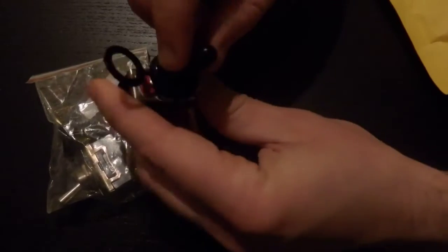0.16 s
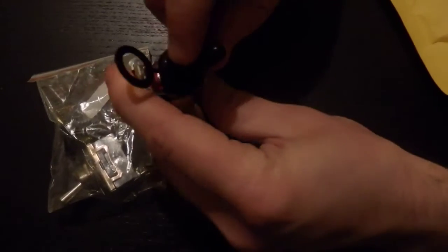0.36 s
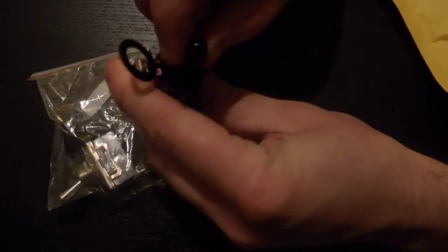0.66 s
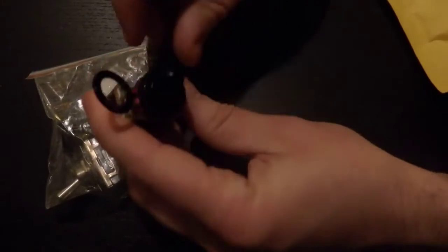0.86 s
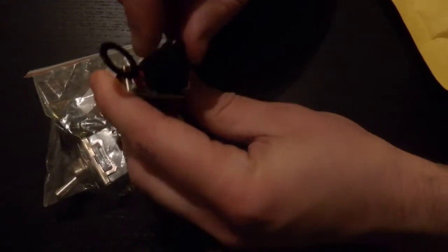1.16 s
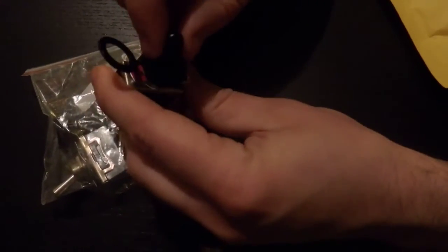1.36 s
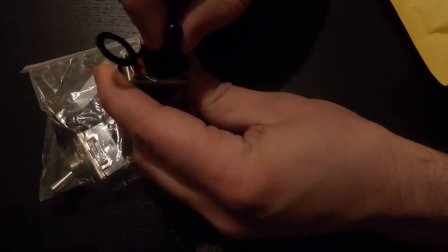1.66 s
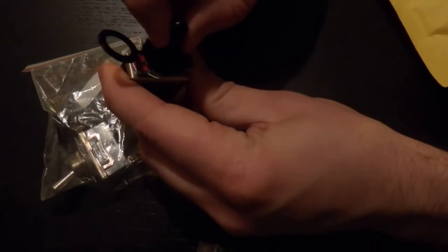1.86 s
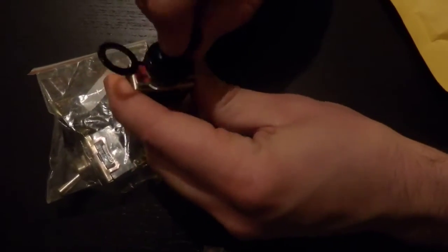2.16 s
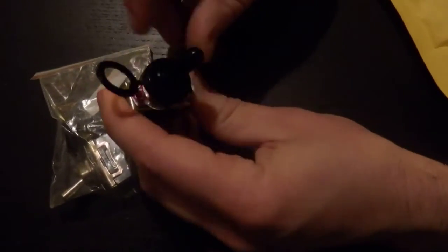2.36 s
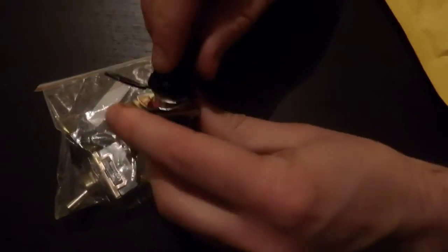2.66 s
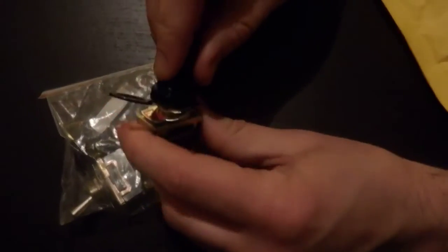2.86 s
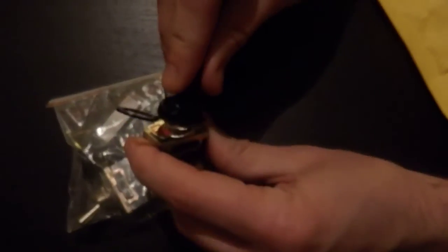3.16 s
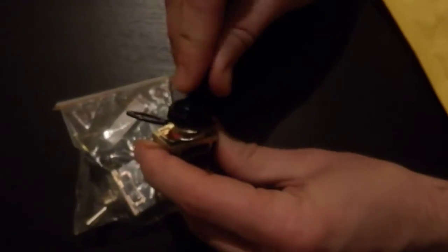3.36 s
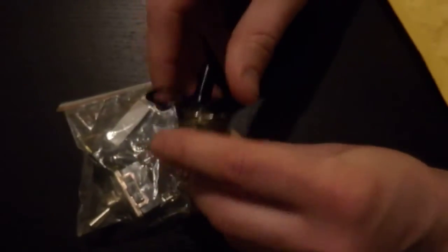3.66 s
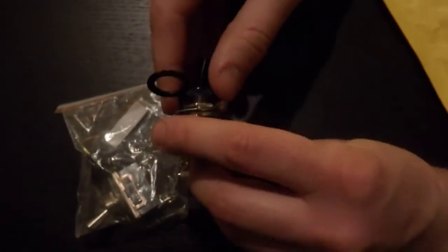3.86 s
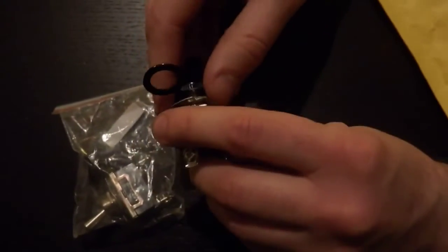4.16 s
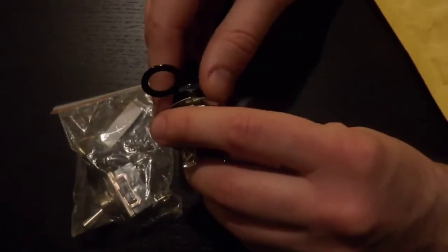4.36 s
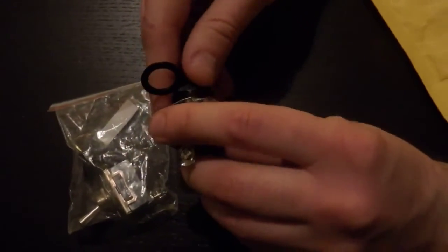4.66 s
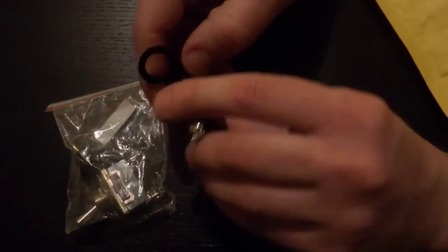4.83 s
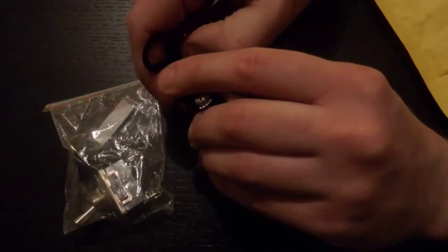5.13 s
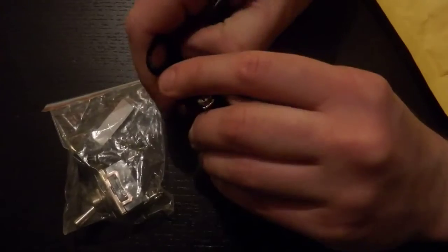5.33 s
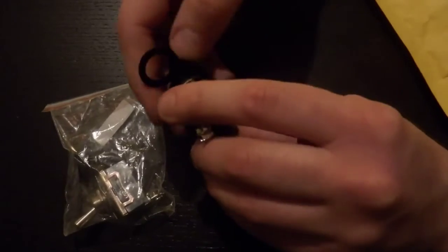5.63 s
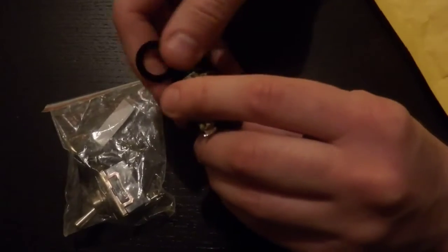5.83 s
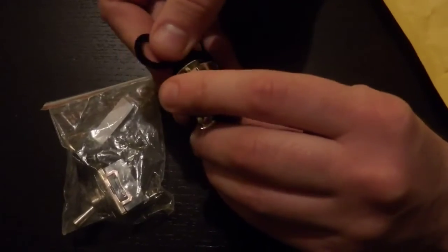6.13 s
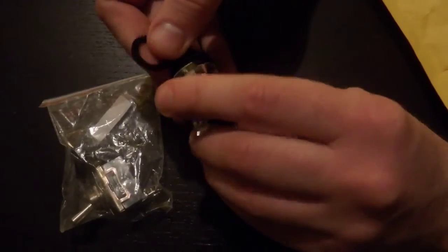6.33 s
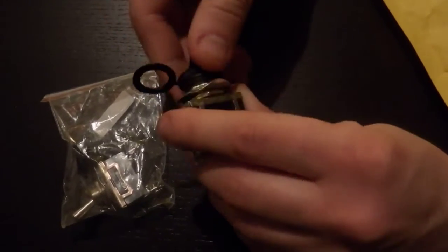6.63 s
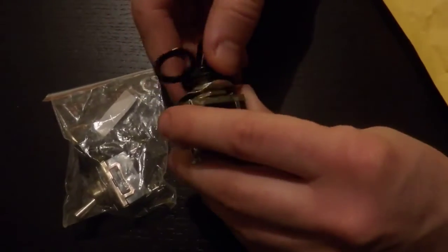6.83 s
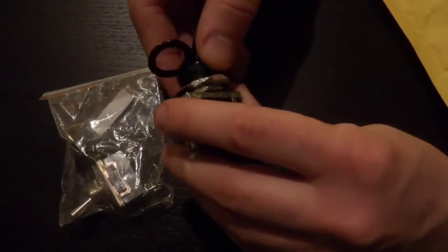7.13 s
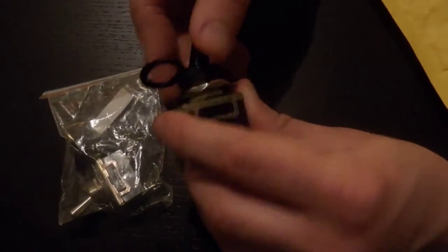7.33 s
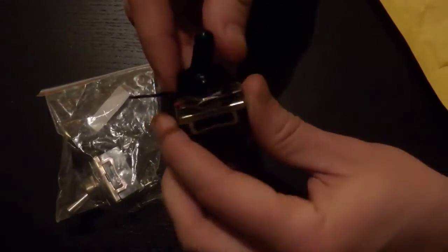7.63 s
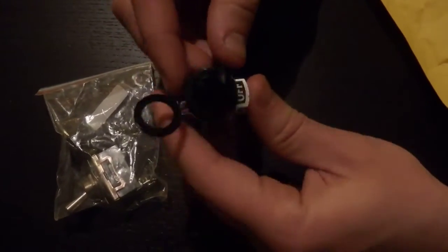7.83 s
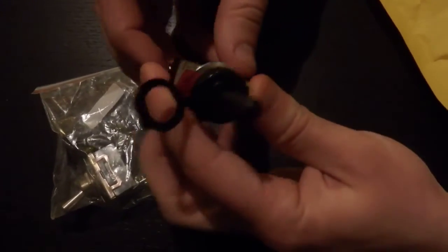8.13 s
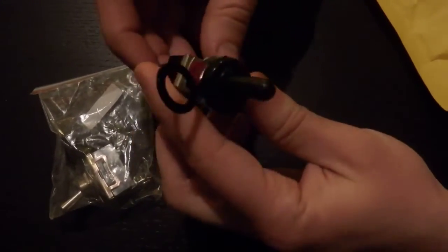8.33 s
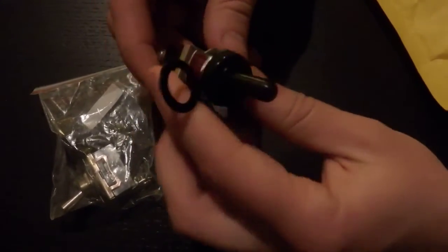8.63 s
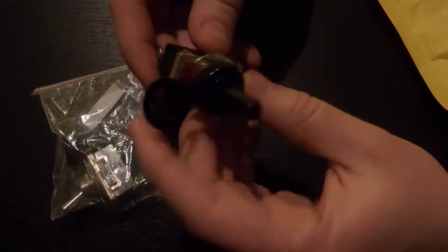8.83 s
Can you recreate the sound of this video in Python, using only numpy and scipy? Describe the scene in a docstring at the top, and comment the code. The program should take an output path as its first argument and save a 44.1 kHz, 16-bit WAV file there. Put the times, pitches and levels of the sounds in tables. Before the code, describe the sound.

In a quiet room, a metal toggle switch snaps sharply close to the microphone, then snaps again with a brief high ring from its spring. Fingers go on handling it, making light, scattered metal clicks and soft rubs as a rubber cover sticks and slips. A faint, rapid focus motor ticking runs through the middle. A few brighter clicks come near the end, over low rumble and slight hiss.

```python
"""First comes the low rumble of a quiet room, under faint hiss, at the microphones of a camera on a table.
Close by, hands work a rubber boot over a metal toggle switch. The lever snaps over twice, striking
the housing and rebounding; the second snap sets its spring ringing. Fingers click on the metal, and
rubber sticks and slips. Through the middle, the camera's focus motor ticks fifteen times a second."""
import sys
import numpy as np
from scipy import signal
from scipy.fft import rfft, irfft
from scipy.io import wavfile
from scipy.ndimage import uniform_filter1d

SR = 44100
rng = np.random.default_rng(int(sys.argv[2]) if len(sys.argv) > 2 else 0)


def unload_wav(signal):
    """Save mono or channel-first audio to the path in sys.argv[1] as 16-bit WAV at rate SR, clipped to [-1, 1]."""
    wavfile.write(
        sys.argv[1],
        SR,
        np.round(np.clip(np.atleast_2d(signal).T, -1, 1) * 32767).astype(np.int16),
    )


N = 396459


def amp(db):
    """Decibels to gain."""
    return 10 ** (np.asarray(db) / 20)


def unit_rms(x):
    """Scales to an rms of one."""
    return x / np.sqrt(np.mean(x ** 2) + 1e-20)


def curve_at(points, hz):
    """Reads a curve on a log-frequency axis."""
    f, value = np.transpose(points)
    return np.interp(np.log(hz + 1), np.log(f + 1), value)


def panned(pan_db):
    """Gains at the two microphones; pan is left minus right in dB."""
    return amp(np.array([[pan_db], [-pan_db]]) / 2)


def add(mix, start, sound):
    """Mixes in a stereo sound at a start in seconds."""
    part = mix[:, max(round(start * SR), 0):][:, :sound.shape[1]]
    part += sound[:, :part.shape[1]]


def coloured(x, points, size=4096):
    """Minimum-phase filter that follows a curve of Hz and dB."""
    log_gain = np.log(amp(curve_at(points, abs(np.fft.fftfreq(size, 1 / SR)))))
    taps = np.fft.ifft(np.exp(np.conj(signal.hilbert(log_gain)))).real
    return signal.fftconvolve(x, taps[None, :size // 2], axes=1)


def toned(x, body_db, edge_db):
    """Soft contacts bring out the body around 3 kHz, hard ones the edge around 15 kHz."""
    tone = [(500, 0), (1800, body_db), (3600, body_db), (7300, 0.0029), (10500, 0), (13800, edge_db)]
    return coloured(x, tone)


def ring(modes, rise_s, loose_cycles=0.074, size=2048):
    """One blow on damped modes, each reaching the two microphones with a slightly loose phase."""
    t = np.arange(size) / SR
    lag_s = np.array([[0], [.000016]])  # the right microphone hears it a little later
    out = 0
    for hz, width, db, pan_db in modes:
        phase = loose_cycles * rng.standard_normal((2, 1)) - hz * lag_s
        decay = np.exp(-np.pi * width * t)
        out = out + amp(db) * panned(pan_db) * decay * np.sin(2 * np.pi * (hz * t + phase))
    out = out * (1 - np.exp(-(t / rise_s) ** 2))
    return out / np.sqrt(np.mean(out[:, :SR // 200] ** 2))  # rms of one over the first 5 ms


def varied(modes, detune, spread_db):
    """The modes as one blow finds them, each a little off in pitch and strength."""
    chance = rng.standard_normal((len(modes), 2))
    return [(hz * (1 + detune * a), width, db + spread_db * b, pan_db)
            for (hz, width, db, pan_db), (a, b) in zip(modes, chance)]


# How alike the two microphones hear the background. Each row: frequency in Hz, likeness from 0 to 1.
MIC_LIKENESS = [(60, 0.91), (120, 0.99), (240, 0.97), (480, 0.91), (950, 0.84), (1890, 0.2), (3770, 0),
                (7520, 0.05), (15000, 0.02)]
BIN_HZ, TIME_S = np.fft.rfftfreq(N, 1 / SR), np.arange(N) / SR


def noise_pair(gain_db):
    """Steady noise of a given spectral shape, nearly mono in the bass."""
    left, other = rfft(rng.standard_normal((2, N)))
    likeness = np.clip(curve_at(MIC_LIKENESS, BIN_HZ), -1, 1)
    right = likeness * left + np.sqrt(1 - likeness ** 2) * other
    return unit_rms(irfft(np.array([left, right]) * amp(gain_db), N))


# Room tone at the table. Each row: frequency in Hz, relative level in dB.
RUMBLE_COLOUR = [(12, -48.5), (20, -16.5), (43, -16.5), (75, -7), (141, -5.5), (166, -2), (217, -3.5),
                 (238, -8), (270, -1), (295, -3.5), (416, -5), (597, -13), (783, -9.5), (1300, -26.5),
                 (1500, -31.5), (1950, -33.5), (3300, -120)]
# The room's standing waves. Each row: frequency in Hz, width in Hz, lift above the rumble in dB.
STANDING_WAVES = [(75, 12, 4), (178, 28, 5), (219.6, 7, 9.5), (260.4, 11, 6), (325.4, 11, 7),
                  (414.8, 10, 5.5), (552.3, 29, 6), (648, 23, 5), (799, 8.7, 5)]
# The rumble's slow swell. Each row: time in seconds, level in dB.
RUMBLE_SWELL = [(0, -52.5), (.55, -53), (.9, -55.5), (2.0, -53), (3.5, -54.5), (4.3, -51.5), (4.6, -54.5),
                (5.6, -54.5), (6.1, -52), (6.6, -54), (8.99, -54)]


def room_rumble():
    """Low noise excites the room's standing waves, a little right of centre."""
    standing_db = sum(db / (1 + (2 * (BIN_HZ - hz) / width) ** 2) for hz, width, db in STANDING_WAVES)
    swell = amp(np.interp(TIME_S, *np.transpose(RUMBLE_SWELL)))
    return noise_pair(curve_at(RUMBLE_COLOUR, BIN_HZ) + standing_db) * swell * panned(-1.7)


# Low tones in the room. Each row: peak time and spread in seconds, pitch in Hz, peak level in dB.
DRONE_TONES = [(0.169, 0.13, 72.9, -58.5), (.7, 0.43, 73.2, -66), (.58, 0.25, 685, -65),
               (1.8, 0.11, 370.7, -59), (4.05, 0.7, 262, -59), (4.25, 0.16, 684, -63.5),
               (5.92, 0.12, 221, -55), (6.1, 0.22, 412.3, -61.5), (8.0, 0.2, 222.3, -53)]


def drones():
    """Faint tones swell out of the rumble and fade, wavering in pitch."""
    out = np.zeros(N)
    for peak, spread, hz, db in DRONE_TONES:
        waver = np.interp(TIME_S, np.linspace(0, TIME_S[-1], 120), rng.standard_normal(120))
        cycles = np.cumsum(hz * (1 + 0.013 * waver)) / SR
        swell = np.exp(-((TIME_S - peak) / spread) ** 2)
        out += amp(db) * np.sqrt(2) * swell * np.sin(2 * np.pi * cycles)
    return out * panned(-2.0)


# The microphones' noise floor. Each row: frequency in Hz, relative level in dB.
HISS_COLOUR = [(700, -10), (1400, 7), (2200, 7), (2800, 5), (3400, 0), (7000, 0), (9300, -1), (11500, -3),
               (13000, 0), (15000, 6), (15700, 11), (15900, -8), (16100, -30)]


def microphone_hiss():
    """The microphones add a steady hiss of their own."""
    return amp(-74.0) * noise_pair(curve_at(HISS_COLOUR, BIN_HZ))


# The camera's steady whine. Each row: centre and half-width in Hz, level and pan in dB.
WHINE_BANDS = [(8350, 230, -90.5, -8.5), (11220, 90, -100.5, -11.5)]
# Its spells of whirring. Each row: start and end in seconds.
WHIR_SPELLS = [(4.2, 4.6), (6.22, 6.7), (7.36, 7.7), (8.25, 9)]


def camera_whine():
    """Narrow bands of high noise from the camera: two hold steady, a third comes and goes."""
    def band(hz, half_width_hz, db, pan_db):
        shape_db = -20 * np.log10(1 + ((BIN_HZ - hz) / half_width_hz) ** 2)
        return amp(db) * panned(pan_db) * noise_pair(shape_db)

    whine = sum(band(*row) for row in WHINE_BANDS)
    running = sum(1.0 * (TIME_S > start) * (TIME_S < end) for start, end in WHIR_SPELLS)
    whir = band(hz=8250, half_width_hz=400, db=-89, pan_db=-2.0)
    return whine + uniform_filter1d(running, size=2048) * whir


# The room's decay. Each row: frequency in Hz, seconds to fall by 60 dB.
ROOM_DECAY = [(497.5, 0.16), (2810, 0.4), (4200, 0.34), (6000, .44), (8950, 0.46), (10400, 0.37),
              (13100, 0.26), (15500, 0.21)]


def room_tail(x):
    """The room returns a short diffuse tail that lingers longest in the mid treble."""
    hz, t, spectra = signal.stft(rng.standard_normal((2, SR * 2 // 3)), SR, nperseg=256)
    decay_db = -60 * t / curve_at(ROOM_DECAY, hz)[:, None]
    tail = signal.istft(spectra * amp(decay_db), SR, nperseg=256)[1]
    tail *= 1 - np.exp(-(np.arange(tail.shape[1]) / SR / 0.0043) ** 2)
    return signal.fftconvolve(x, tail / np.linalg.norm(tail[0]), axes=1)[:, :N]


# A wall near the table. Each row: frequency in Hz, gain of its reflection in dB.
WALL_COLOUR = [(1000, -14), (2800, -7.5), (3400, -11), (4400, -2), (5500, -20), (8500, -14), (13000, -24)]


def wall_echo(x, delay_s=.0133):
    """One dull early reflection reaches the microphones just behind the direct sound."""
    out = np.zeros((2, N))
    add(out, delay_s, coloured(x, WALL_COLOUR))
    return out


# Inside the camera: the drive's tick, the lens barrel's slower ring and the click of a catching step.
# Each row: frequency and width in Hz, relative level and pan in dB.
DRIVE_MODES = [(4700, 1000, 6, -5.5), (6100, 720, 3, 0), (7140, 530, 2, 0), (8580, 700, 8, -8),
               (9280, 600, -3, -12)]
BARREL_MODES = [(1037, 71, -0.5, 0), (1147, 53, 1.5, 0), (1350, 130, -1.5, 0), (1660, 170, 1.5, 0),
                (1856, 89, 2, 0), (2190, 165, -1.5, 0), (2770, 240, -6, 0)]
CATCH_MODES = [(2010, 230, -5.5, -7), (4640, 760, 1, -1), (5520, 660, 5.5, 1), (6900, 410, -2, 0)]
# Step force as the lens travels. Each row: time in seconds, base levels of barrel and drive in dB.
STEP_FORCE = [(1.28, -64, -64.5), (2.1, -65.5, -65.5), (2.58, -64, -62.5), (2.73, -68, -74.5),
              (2.83, -62, -57.5), (2.95, -71, -67.5), (3.02, -71, -78.5), (3.12, -67.5, -65.5),
              (3.6, -67.5, -66), (4.3, -65, -70), (4.75, -64, -65), (4.829, -65.5, -64.5),
              (5.299, -66, -66), (5.43, -68, -71), (5.75, -65, -67), (5.83, -69.5, -62), (6.08, -64, -63),
              (6.16, -61.5, -70)]
# Steps that catch. Each row: start in seconds, level in dB.
STEP_CATCHES = [(1.483, -75), (2.35, -68), (2.817, -64), (3.618, -63), (3.885, -68), (4.152, -66),
                (4.419, -63.5), (4.486, -79), (4.819, -75), (5.286, -70), (5.42, -63.5), (5.687, -63.5),
                (6.157, -65.5)]
FOCUS_START_S, FOCUS_END_S, STEPS_PER_S = 1.2825, 6.17, 14.985


def focus_motor():
    """Steps, strong and weak in turn: the drive takes up its slack, ticks and shakes the lens barrel."""
    out = np.zeros((2, N))
    times, barrel_db, drive_db = np.transpose(STEP_FORCE)
    for k, start in enumerate(np.arange(FOCUS_START_S, FOCUS_END_S, 1 / STEPS_PER_S)):
        swing_db = 1.2 * (-1) ** (k + 1) + 1.3 * rng.standard_normal()
        for part, force_db in ((DRIVE_MODES, drive_db - 3.0), (BARREL_MODES, barrel_db + 2.0)):
            level_db = np.interp(start, times, force_db) + swing_db
            slack_s = .0022 * rng.uniform(.6, 1.5)
            for ahead, db in ((slack_s, -8), (0, 0)):
                modes = varied(part, detune=.013, spread_db=1.7)
                add(out, start - ahead, amp(level_db + db) * ring(modes, rise_s=.001, loose_cycles=.16))
        # the barrel rattles once after each step
        rattle_db = np.interp(start, times, barrel_db) + swing_db - 5
        rattle_start = start + .0026 * rng.uniform(.5, 1.5)
        modes = varied(BARREL_MODES, detune=.06, spread_db=1.7)
        add(out, rattle_start, amp(rattle_db) * ring(modes, rise_s=.001, loose_cycles=.5))
    for start, db in STEP_CATCHES:
        modes = varied(CATCH_MODES, detune=.04, spread_db=2)
        add(out, start, amp(db) * ring(modes, rise_s=.0014, loose_cycles=.16))
    return out


# The boot on the collar, close up. Each row: start and length in seconds, level and body in dB.
BOOT_SCUFFS = [(3.294, 0.096, -79.5, -11), (3.505, 0.05, -79, -14), (6.347, 0.15, -78.5, 8),
               (6.45, 0.42, -88, 0), (7.341, .25, -75, 2), (8.387, .07, -84, -7), (8.673, 0.041, -73, -13),
               (8.842, 0.065, -75, -2)]
# Brushing rubber. Each row: frequency in Hz, relative level in dB.
SCUFF_COLOUR = [(500, -25), (1600, -7), (2100, -3), (2450, 3), (2800, 1), (3400, -9), (4200, -7),
                (5300, -6), (6500, -16), (12000, -27)]


def boot_scuffs(slips_per_s=2500):
    """Rubber brushes over the collar in a soft swell of dense, tiny slips."""
    out = np.zeros((2, N))
    for start, length, db, body_db in BOOT_SCUFFS:
        progress = np.linspace(0, 1, max(int(length * SR), 64))
        size = len(progress)
        slips = rng.standard_normal((2, size)) * (rng.random(size) < slips_per_s / SR)
        swell = np.sin(np.pi * progress ** 1.1)  # peaks just past midway
        brush = coloured((slips + .5 * slips[::-1]) * swell, SCUFF_COLOUR)
        add(out, start, amp(db) * unit_rms(toned(brush, body_db, 0)[:, :size]))
    return out


# Strokes on the housing. Each row: start and length in seconds, base level, body and edge in dB.
FINGER_STROKES = [(0.697, 0.025, -68, 7.5, -22), (0.721, 0.012, -69.5, 3, 6), (2.258, 0.063, -73.5, 6, -1),
                  (2.845, 0.015, -72, 0, -16), (3.505, 0.034, -80, 11, -10), (4.668, 0.013, -57, -13, 8.5),
                  (6.406, 0.065, -79.5, 1, 6), (6.63, 0.085, -80, -10, 4), (6.88, 0.024, -67, -13, 0),
                  (7.392, 0.22, -85, -1, -1), (7.498, 0.033, -73, -11, 8), (7.789, 0.04, -72.5, -1.5, -1),
                  (7.904, 0.039, -75, -15, 8), (8.118, 0.016, -52.5, -8.5, -3), (8.67, 0.039, -79, -6, -4),
                  (8.859, 0.051, -71.5, 0, 9.5), (8.922, 0.021, -66, 0, 13),
                  (8.941, 0.01, -46.5, -10.5, -3)]
# Slipping skin and rubber. Each row: frequency in Hz, relative level in dB.
SLIP_COLOUR = [(100, -52), (1200, -7), (1900, 5), (2500, 6), (3400, -5.5), (4700, 0), (6500, -2.5),
               (8300, -4.5), (9400, 4), (11500, -11.5), (14000, 5), (15700, 4), (16200, -28)]


def finger_rubs():
    """Fingers and rubber stick and slip: an uneven train of tiny scrapes under each stroke."""
    out = np.zeros((2, N))
    for start, length, db, body_db, edge_db in FINGER_STROKES:
        slips_per_s = 440 * (0.041 / length) ** 0.37  # short strokes slip faster
        progress = np.linspace(0, 1, max(int(length * SR), 64))
        size = len(progress)
        slip_count = np.cumsum(slips_per_s * rng.exponential(1, size)) / SR
        strength = amp(3.8 * rng.standard_normal(int(slip_count[-1]) + 1))[slip_count.astype(int)]
        grit = rng.standard_normal((2, size))
        stroke = progress ** .5 * (1 - progress) * strength * np.exp(-(slip_count % 1))
        scrape = coloured((grit + .5 * grit[::-1]) * stroke, SLIP_COLOUR)
        scrape /= np.sqrt(np.mean(scrape[:, :size] ** 2))
        add(out, start, amp(db + 3.0) * toned(scrape, body_db, edge_db))
    return out


# The washer, dead centre. Each row: start in seconds, level in dB, lift of modes over 4 kHz in dB.
WASHER_PINGS = [(1.6595, -79, 18), (2.0695, -61, 5), (2.8484, -63.5, -1)]
# Its modes. Each row: frequency in Hz, relative level in dB, seconds to fall by 60 dB.
WASHER_MODES = [(1900, 3.5, 0.22), (1910, -2, 0.076), (2640, -14, .13), (3100, -15, 0.19), (4370, -7, 0.14),
                (5400, -9, .08)]


def washer_pings():
    """A thin, loose washer rings in a few clear modes."""
    out, t = np.zeros((2, N)), np.arange(SR // 3) / SR
    for start, db, high_db in WASHER_PINGS:
        ping = sum(amp(mode_db + high_db * (hz > 4000) - 60 * t / t60) * np.sin(2 * np.pi * hz * t)
                   for hz, mode_db, t60 in WASHER_MODES)
        add(out, start, amp(db) * panned(0) * ping)
    return out


# Dull knocks: the lever rocking, and a few heavy focus-motor steps.
# Each row: start in seconds, level in dB.
DULL_KNOCKS = [(0.26, -64), (0.701, -57.5), (2.0735, -50), (2.2758, -49.5), (2.7547, -66), (3.351, -58),
               (6.1566, -72), (8.1157, -52.5)]
# The collar's modes. Each row: frequency and width in Hz, relative level and pan in dB.
COLLAR_MODES = [(814, 200, 7, -3.5), (1056, 140, -3, -0.5), (1764, 55, -6.5, 0), (2202, 170, 7, -6),
                (3240, 300, -8, 0), (4700, 200, -7, 6)]


def dull_knocks(blows):
    """Low, damped modes knock as the lever rocks, on heavy focus steps and under every metal contact."""
    out = np.zeros((2, N))
    shaken = [(start, -49 + 0.3 * (db + body_db)) for start, db, body_db, *_ in blows]
    for start, db in DULL_KNOCKS + shaken:
        add(out, start, amp(db) * ring(COLLAR_MODES, rise_s=.0006))
    return out


# Blows on the spring, near centre. Each row: start in seconds, level in dB, seconds until it is
# damped, lift of modes under 10 kHz in dB.
SPRING_BLOWS = [(1.660, -56, .02, 5), (2.0742, -31, 0.066, -3), (2.0758, -24, 0.0046, 3),
                (2.0778, -31.5, .044, 0), (2.0968, -31, 0.023, 2), (4.669, -51, .006, 9),
                (8.917, -39.5, .009, 3), (8.939, -42, .007, 11)]
# Its modes. Each row: frequency in Hz, relative level in dB, seconds to fall by 60 dB.
SPRING_MODES = [(4420, -26, .06), (7600, -24, .09), (8720, -22, .05), (9410, -20, .04), (13290, -11, .13),
                (13760, -9, .2), (14000, -9, .04), (14410, -9, .05), (14660, -6, .075), (15000, -11, .04),
                (15300, -6, .05), (15730, -2, .1)]


def spring_twangs():
    """The spring bounces on its seat and sings in close high modes, buzzing a little, until it settles."""
    out, t = np.zeros((2, N)), np.arange(SR // 8) / SR
    count = len(SPRING_MODES)
    for start, db, held, low_db in SPRING_BLOWS:
        phases = rng.random((count, 1, 1)) + 0.3 * rng.standard_normal((count, 2, 1))
        buzz = 0.005 * np.cumsum(rng.standard_normal((count, 1, len(t))), axis=2)
        tone = 0
        for (hz, mode_db, t60), phase in zip(SPRING_MODES, phases + buzz):
            decay = amp(mode_db + low_db * (hz < 10000) - 60 * t / t60)
            tone = tone + decay * np.sin(2 * np.pi * (hz * t + phase))
        attack = 1 - np.exp(-t / .0003)
        damping = np.exp(-np.maximum(t - held, 0) / 0.0056)
        add(out, start, amp(db) * tone * attack * damping * panned(0.92))
    return out


# A click as the room gathers it. Each row: frequency in Hz, relative level in dB.
RADIATED_COLOUR = [(100, -35), (1400, -16), (2250, -12), (2600, 2), (3000, 1.5), (3400, -5), (4100, 2),
                   (4900, -1.5), (5600, -7.5), (6300, -1), (9000, 5), (9700, -2), (11800, -6), (13200, 2.5),
                   (14300, 2.5), (15600, 10.5), (16200, -9.5)]


def radiated_clicks(blows, lift_db=23):
    """What the housing sends into the room: over all directions, its modes blur into one broad colour."""
    out = np.zeros((2, N))
    for start, db, body_db, edge_db, _ in blows:
        impulse = amp(db + lift_db) * np.ones((2, 1))
        add(out, start, toned(impulse, body_db, edge_db))
    return coloured(out, RADIATED_COLOUR)[:, :N]


# The housing's modes, close up, plus the microphones' sharp resonance near 15.6 kHz.
# Each row: frequency and width in Hz, relative level and pan in dB.
CLICK_MODES = [(2690, 182, -3, -6.5), (3024, 253, -1.5, -6.5), (4090, 287, 3, 2), (5210, 290, 2.5, 6),
               (6394, 260, 3, 6.5), (7720, 370, 6, 4.5), (8260, 300, 6, -7), (9020, 340, 6.5, -13),
               (10400, 400, -1, -4.5), (12100, 400, -10.5, -5.5), (13400, 270, 2, 10.5),
               (14300, 280, -3.5, -4.5), (15030, 210, 8, 5), (15620, 240, 17, -4)]
# Metal chattering on metal. Each row: frequency in Hz, relative level in dB.
CHATTER_COLOUR = [(100, -35.5), (1300, -19), (2200, -15), (2750, 3.5), (3400, -4), (4100, -4), (5000, 0),
                  (7000, -6), (8800, 3), (10000, 1.5), (12000, -1), (14000, 4.5), (15600, 7.5),
                  (16600, -8.5)]


def housing_clicks(blows):
    """Each sharp blow rings the housing and the microphones, with a millisecond of metal chatter."""
    out, t = np.zeros((2, N)), np.arange(512) / SR
    for start, db, body_db, edge_db, chatter_share in blows:
        share = np.clip(chatter_share, 0, 1)
        burst = rng.standard_normal((2, len(t))) * np.exp(-t / .0012) * (1 - np.exp(-t / .0003))
        modes = varied(CLICK_MODES, detune=.035 * share, spread_db=1.8 * share)  # the grip shifts
        ringing = ring(modes, rise_s=0.0007, loose_cycles=0.11)
        chatter = coloured(burst + 0.24 * burst[::-1], CHATTER_COLOUR)[:, :ringing.shape[1]]
        chatter *= np.linalg.norm(ringing) / np.linalg.norm(chatter)
        click = np.sqrt(1 - share) * ringing + np.sqrt(share) * chatter
        add(out, start, amp(db) * toned(click, body_db, edge_db))
    return out


# Small metal clicks: finger taps, and the rattle after the second snap.
# Each row: start in seconds, then level, body and edge in dB.
SMALL_CLICKS = [(.315, -58.5, -3, 2.5), (1.659, -37.5, 2.5, -8), (1.768, -43, 7, -1),
                (2.0725, -31.5, -11, 0.5), (2.0752, -49, -13, 10), (2.0875, -44.5, 2, 1),
                (2.0972, -50, -4, 8), (2.276, -63.5, 19, -9), (2.8482, -62.5, -2, -9),
                (4.1132, -54.5, -8, 0), (5.083, -49, -17, 0.5), (5.513, -56, 14.5, -4),
                (5.7988, -62, 5, -9), (5.8591, -62.5, 2, -14), (6.2537, -58, -21, -16),
                (6.3524, -54, -7.5, -20), (6.505, -68.5, 4.5, -10), (6.6443, -64, -7, 5),
                (6.695, -64.5, 1, -1), (6.8945, -56, -16, 5), (7.129, -73.5, 20.5, -8), (7.32, -74, 7, -11),
                (7.5059, -63, -2, 4), (7.519, -62, 0, -1.5), (7.5717, -65, -6, 3), (7.6936, -57, 2.5, 0),
                (7.7912, -63.5, -1.5, 0), (8.0185, -59, -1, 0), (8.0315, -53.5, -4, 3),
                (8.0855, -59, -1, 0), (8.1165, -40, 1.5, 12), (8.677, -56, -17, -6), (8.693, -56, -9, 0),
                (8.9155, -52, -5, 2), (8.9378, -48, -4, 3)]
# The lever snapping over, close to the microphones. Each row: start in seconds; level, body and edge
# in dB; then seconds from release to snap, from snap to first rebound, and from snap to rest.
LEVER_SNAPS = [(0.524, -19.5, 1.5, -1.5, .0062, .0022, .003), (2.0683, -25.5, 6, -1, 0.0044, 0.0046, .015)]
# Level against the snap, body and edge: of the release, the first rebound, and the step to each next.
RELEASE_DB, REBOUND_DB, REBOUND_STEP_DB = (-18.5, -4.5, -2.2), (-14.5, -2.5, 2.5), (-2.5, -0.27, 1.5)
SNAP_CHATTER, CLICK_CHATTER, CHATTER_PER_EDGE_DB = .015, .36, 0.05  # shares of a contact's energy


def switch_contacts():
    """Lists the blows: small clicks; the lever slips off its ridge, lands squarely and rebounds."""
    square, glancing = [], list(SMALL_CLICKS)
    for start, db, body_db, edge_db, ahead, first, settled in LEVER_SNAPS:
        square.append((start, db, body_db, edge_db, SNAP_CHATTER))
        glancing.append((start - ahead, db + RELEASE_DB[0], *RELEASE_DB[1:]))
        for k in range(8):
            after = first * 1.7 ** k
            drop_db, *colour = np.add(REBOUND_DB, k * np.array(REBOUND_STEP_DB))
            if after < settled:
                glancing.append((start + after, db + drop_db, *colour))
    return square + [(start, db, body_db, edge_db, CLICK_CHATTER + CHATTER_PER_EDGE_DB * edge_db)
                     for start, db, body_db, edge_db in glancing]


# How much of the switch goes to the room; less sounds closer. Each row: time in seconds, gain in dB.
ROOM_SEND = [(0, -24), (2, -16.5), (7.4, -20.5), (8, -23), (8.99, -15)]
MOTOR_SEND_DB = -16.5


def scene():
    """From the table: the switch close by, the camera's own noises, and the room around both."""
    blows, motor = switch_contacts(), focus_motor()
    handling = spring_twangs() + dull_knocks(blows) + washer_pings() + finger_rubs() + boot_scuffs()
    send = amp(np.interp(TIME_S, *np.transpose(ROOM_SEND)))
    into_room = send * (radiated_clicks(blows) + handling) + amp(MOTOR_SEND_DB) * motor
    direct = housing_clicks(blows) + handling + motor
    reflections = room_tail(into_room) + wall_echo(into_room)
    background = room_rumble() + microphone_hiss() + camera_whine() + drones()
    return background + reflections + direct


def record(dry, cutoff_hz=16600):
    """The camera's band limit cuts off the highest treble."""
    lowpass = signal.firwin(255, cutoff_hz, window=("kaiser", 9), fs=SR)
    return signal.oaconvolve(dry, lowpass[None], "same")


dry = scene()
out = record(dry)
unload_wav(out)
```